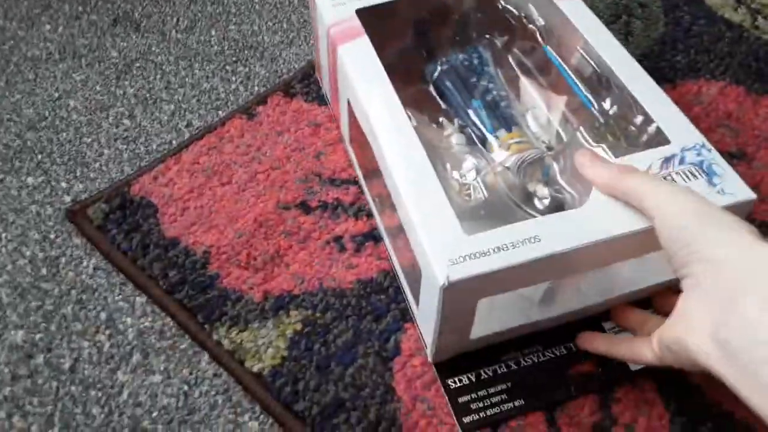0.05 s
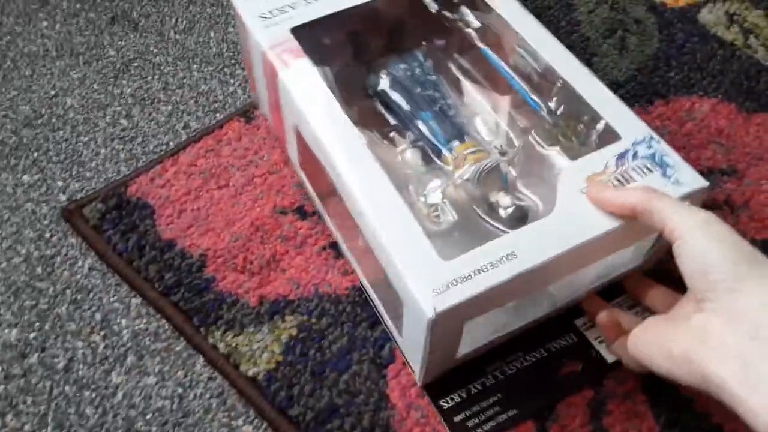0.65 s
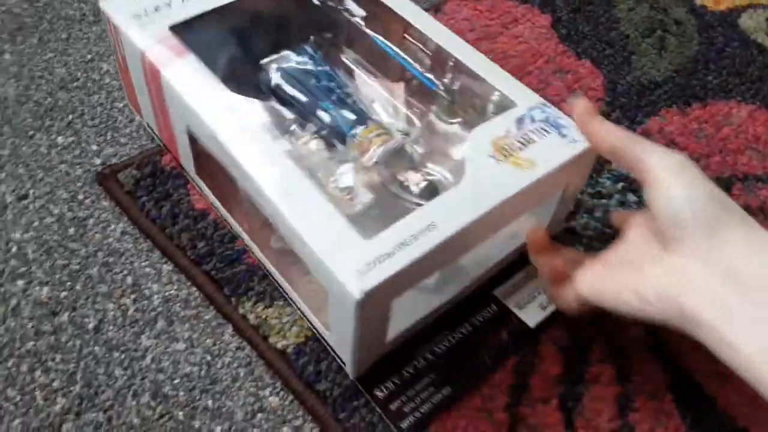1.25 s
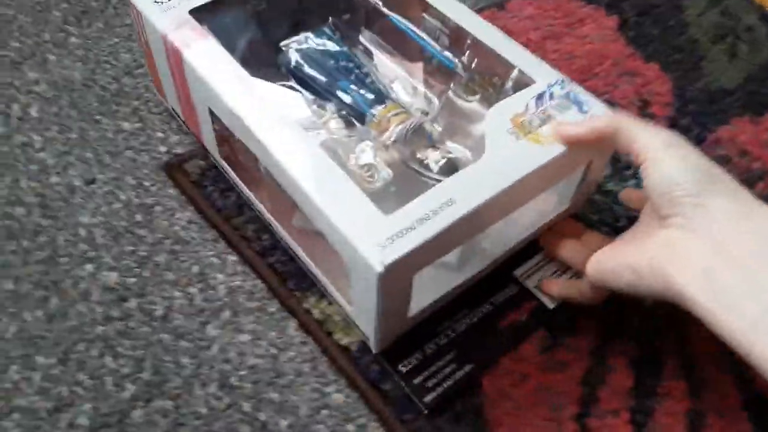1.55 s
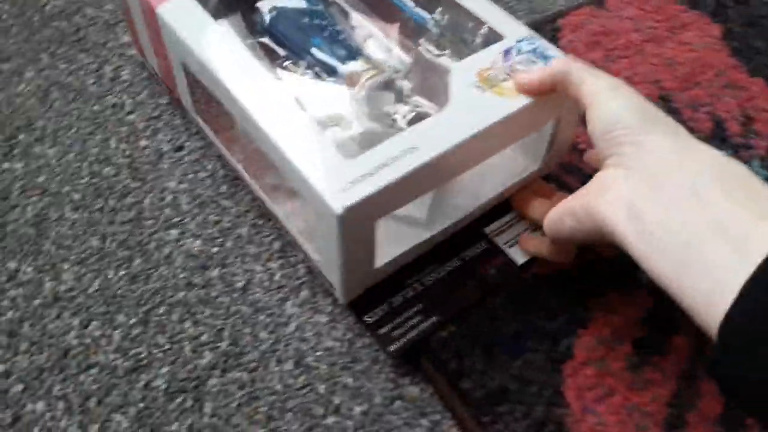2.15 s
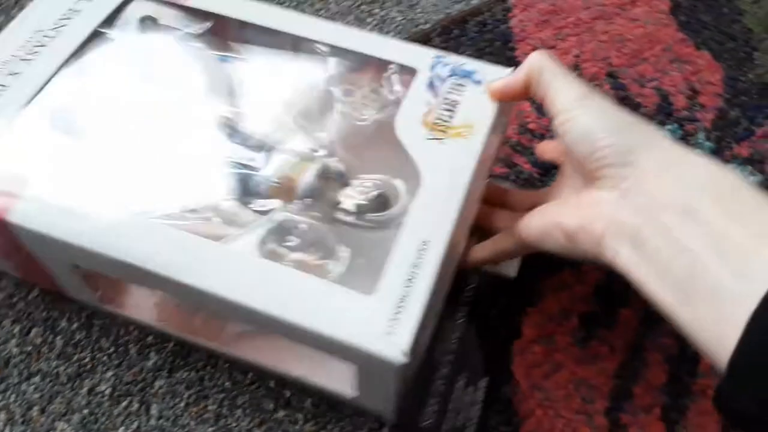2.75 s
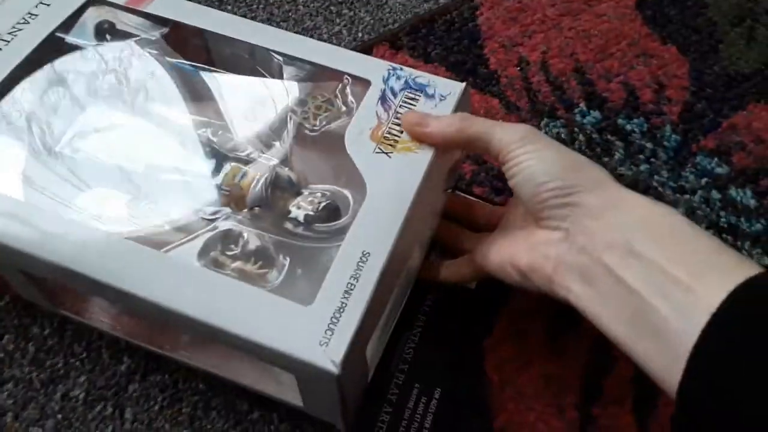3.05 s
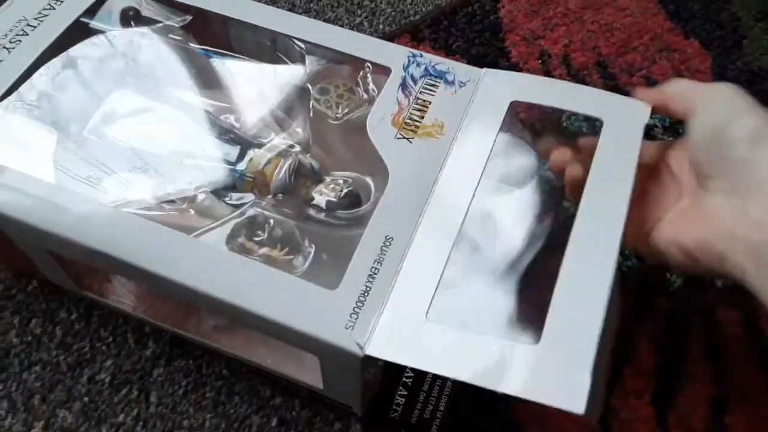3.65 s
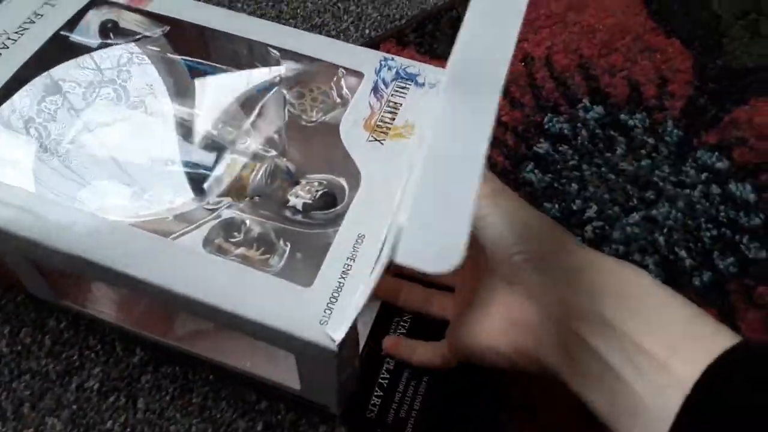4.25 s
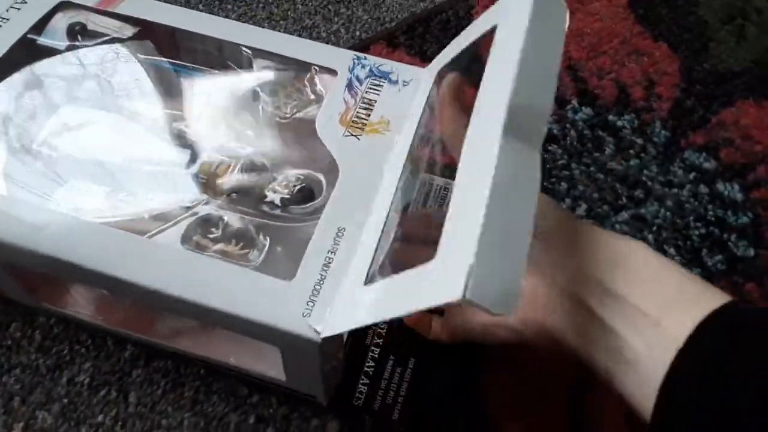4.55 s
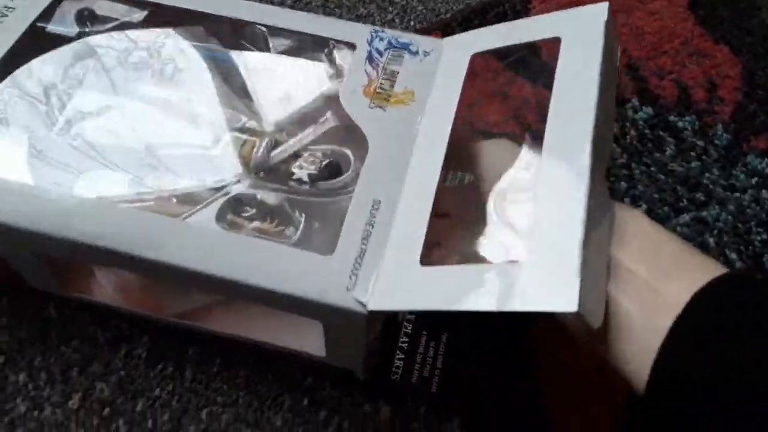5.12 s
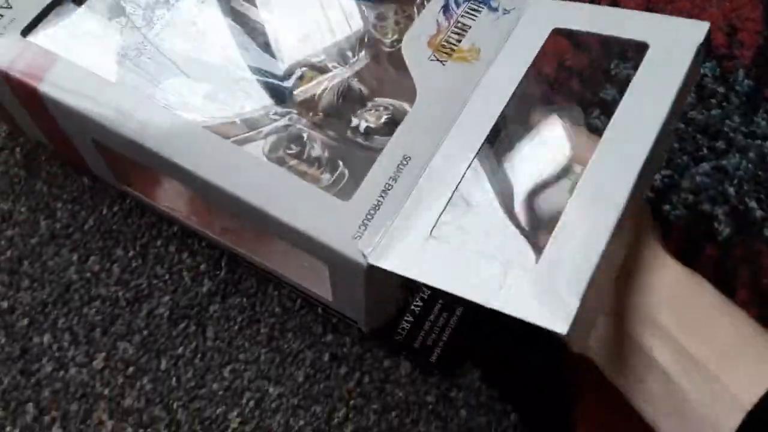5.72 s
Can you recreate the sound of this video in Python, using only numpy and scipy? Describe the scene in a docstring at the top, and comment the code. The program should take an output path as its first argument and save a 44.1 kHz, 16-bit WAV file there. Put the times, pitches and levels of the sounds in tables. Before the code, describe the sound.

A cardboard box bumps and rubs on a rug, then its flap scrapes open with sharp snaps and plastic pops.

```python
"""A cardboard display box is turned on a rug, close to a small microphone in a furnished room.
First it bumps on the floor, its plastic tray ticking, while hand and sleeve rub along the card.
Around 3 s the end flap is prised and scraped out of its slot with a squeak, and a tray dimple pops.
More bumps follow; from 4.6 s fingers snap the inner flaps and further dimples flip.
The microphone port rings in the treble throughout."""
import sys
import numpy as np
from scipy import signal
from scipy.fft import rfft, irfft, next_fast_len
from scipy.io import wavfile
from scipy.ndimage import uniform_filter1d, map_coordinates

SR = 44100
rng = np.random.default_rng(int(sys.argv[2]) if len(sys.argv) > 2 else 0)


def dump(signal):
    """Clip the signal to [-1, 1] and save it as 16-bit WAV at the path in sys.argv[1]."""
    limited = np.clip(np.atleast_2d(signal).T, -1, 1)
    pcm = np.round(limited * 32767).astype(np.int16)
    wavfile.write(sys.argv[1], SR, pcm)


N = 263838


def amp(db):
    return 10 ** (np.asarray(db) / 20)


def unit(x):
    return x / np.sqrt(np.mean(x ** 2) + 1e-20)


def along(points, hz):
    """Read a curve of (freq_hz, value) points on a log frequency axis."""
    freq_hz, values = np.transpose(points)
    return np.interp(np.log(hz + 1), np.log(freq_hz + 1), values)


def filtered(x, response):
    """Pass x through a complex frequency response."""
    size = next_fast_len(len(x) + 8192)
    return irfft(rfft(x, size) * response(np.fft.rfftfreq(size, 1 / SR)), size)[:len(x)]


def coloured(x, spectrum):
    """Shape x with an EQ curve of (freq_hz, gain_db), at rms 1."""
    return unit(filtered(x, lambda hz: amp(along(spectrum, hz))))


def wobble(knots_per_s):
    """A smooth random drift."""
    return map_coordinates(rng.standard_normal(N // 100), [np.arange(N) * knots_per_s / SR])


def add(track, start_s, sound):
    """Mix a sound into the track."""
    start = max(round(start_s * SR), 0)
    track[start:start + len(sound)] += sound[:N - start]


def slips(count, per_s):
    """Stick and slip: irregular little jerks of unequal size, at rms 1."""
    happens = rng.random(count) < per_s / SR
    return unit(happens * rng.standard_normal(count))


def background(air_db=-70, hum_db=-77, whine_db=-84, whine_hz=10560, width_hz=170, hiss_db=-85.5):
    """Still room air, a faint hum, and the thin whine and hiss of the electronics."""
    # room tone: freq_hz, gain_db
    air_spectrum = [(20, -5), (50, -4.5), (100, 8.5), (200, -30.5), (500, -15.5), (1000, -14),
                    (3000, -44.5), (7000, -35.5), (16000, -39.5)]
    air = amp(air_db) * coloured(rng.standard_normal(N), air_spectrum)
    hum = amp(hum_db) * unit(np.sin(2 * np.pi * 97 * np.arange(N) / SR))
    whine = unit(filtered(rng.standard_normal(N), lambda hz: np.exp(-((hz - whine_hz) / width_hz) ** 2)))
    return air + hum + amp(whine_db) * whine + amp(hiss_db) * rng.standard_normal(N)


def room(sound, build_up_s=0.0016):
    """The short reverb of a small furnished room, wet only, with a fresh tail each time."""
    # reverb decay: freq_hz, t60_s
    decay = [(100, 0.17), (500, 0.21), (2000, 0.26), (8000, 0.16), (16000, 0.055)]
    # reverb against the direct sound: freq_hz, level_db
    wet = [(100, -1.5), (400, -6), (1500, -8.5), (5000, -7), (12000, -6)]
    hz, t, noise = signal.stft(rng.standard_normal(SR // 3), SR, nperseg=256)
    t60 = along(decay, hz)[:, None]
    power = 2 * np.log(1000) / (t60 * SR)
    fade = amp(along(wet, hz)[:, None] - 60 * t / t60)
    tail = signal.istft(noise * np.sqrt(power) * fade, SR, nperseg=256)[1]
    tail *= 1 - np.exp(-(np.arange(len(tail)) / SR / build_up_s) ** 2)  # the walls answer a moment late
    return signal.fftconvolve(sound, tail)


def rubbing(jolts, settle_s=0.032, sleeve_trim_db=-9):
    """The box shuffles dully on the rug, skin and cloth hiss over card; both swell after a jolt."""
    # handling moves: time_s, slide_db, sleeve_db (before the trim)
    moves = [(0.0, -59.5, -61), (0.37, -67.5, -67.5), (0.6, -59, -56), (0.92, -56, -56), (1.17, -56.5, -50),
             (1.652, -62.5, -54), (1.98, -55, -51), (2.35, -68.5, -53), (2.62, -55.5, -64),
             (2.86, -67, -50.5), (3.019, -63, -72), (3.4, -37, -50), (3.62, -61, -59), (4.1, -60.5, -66.5),
             (4.48, -62, -69), (4.779, -47.5, -59), (5.4, -46.5, -51), (5.98, -48.5, -54.5)]
    # card on rug: freq_hz, gain_db
    slide_spectrum = [(30, -17), (80, -2), (150, 0.5), (350, 1.5), (520, -5), (750, -4), (1200, -17.5),
                      (2500, -18), (6000, -51)]
    # hand and sleeve on card: freq_hz, gain_db
    sleeve_spectrum = [(200, -25), (900, -1.5), (1400, 3), (2200, 2), (3600, 0.5), (5500, -3.5), (7000, -5),
                       (10000, -6), (16000, -2)]
    time_s, *levels = np.transpose(moves)
    slide_db, sleeve_db = [np.interp(np.arange(N) / SR, time_s, db) for db in levels]
    hold = np.exp(-1 / (settle_s * SR))
    unrest = np.sqrt(signal.lfilter([1 - hold], [1, -hold], jolts ** 2))  # rms follower
    slide = coloured(slips(N, per_s=1100) + .5 * rng.standard_normal(N), slide_spectrum)
    sleeve = coloured(0.15 * slips(N, per_s=2300) + rng.standard_normal(N), sleeve_spectrum)
    grip_db = 2 * wobble(knots_per_s=44)
    slide *= np.hypot(amp(slide_db), amp(-28) * unrest) * amp(grip_db)
    sleeve *= np.hypot(amp(sleeve_db), amp(-26) * unrest) * amp(sleeve_trim_db + grip_db)
    return slide + sleeve


def squeak(start_s=3.377, length_s=.022, pitch_hz=8600, level_db=-43, waver_hz=300):
    """The glossy flap squeaks as it leaves the slot."""
    track, t = np.zeros(N), np.arange(SR // 20) / SR
    hz = pitch_hz + waver_hz * unit(uniform_filter1d(rng.standard_normal(len(t)), size=60))
    swell = np.sin(np.pi * np.clip(t / length_s, 0, 1))
    add(track, start_s, amp(level_db) * swell * np.sin(2 * np.pi * np.cumsum(hz) / SR))
    return track + room(track)[:N]


def box_ring(ring_db, scatter_db):
    """One jerk on the box: a direct click, then panel modes whose strengths vary from spot to spot."""
    # modes of the panels and the air inside: pitch_hz, level_db, t60_s
    modes = [(76, -13.5, 0.039), (116, -4.5, 0.019), (158, -10.5, 0.011), (186, -1.5, 0.034),
             (285.3, -6, 0.092), (366.6, 2.5, 0.066), (399, 2, 0.12), (535, -9.5, 0.054), (616.4, -6, 0.1),
             (698, 7, 0.038), (808.5, 1, 0.087), (973, -21.5, 0.021), (1120, -1, 0.027),
             (1535, -0.5, 0.057), (1633, 14.5, 0.015), (2136, 18, 0.013), (2780, 7, 0.031),
             (3220, -11.5, 0.012)]
    t = np.arange(SR // 8) / SR
    hz, db, t60 = np.transpose(modes)[:, :, None]
    strength = amp(db + ring_db + scatter_db * rng.standard_normal(hz.shape))
    bent_hz = hz * (1 + .06 * rng.standard_normal(hz.shape))  # the grip bends and detunes the panels
    return (t == 0) + np.sum(strength * amp(-60 * t / t60) * np.cos(2 * np.pi * bent_hz * t), axis=0)


def voiced(motion, levels_db, span_s=.01, baffle_hz=130):
    """Voice the card's motion in five registers, each with the energy of its level held for span_s."""
    # bounds of the thump, hollow, knock, clack and tick registers: edge_hz
    edges_hz = [35, 250, 560, 1200, 4000, 16000]
    sound = np.zeros(len(motion))
    low_cut = signal.butter(2, baffle_hz, "high", fs=SR, output="sos")  # small panels radiate little bass
    radiated = signal.sosfilt(low_cut, motion)
    for low, high, db in zip(edges_hz, edges_hz[1:], levels_db):
        band = signal.sosfilt(signal.butter(4, [low, high], "band", fs=SR, output="sos"), radiated)
        sound += amp(db) * band * np.sqrt(span_s * SR / (np.sum(band ** 2) + 1e-20))
    return sound


def scrapes(edge_s=0.0023, firm_db=-28.5, firm_slips_per_s=1800):
    """A dragged edge catches and slips: coarsely when pressed, in a fine hiss when light."""
    # card edges and fingers dragged over card: start_s, end_s, level_db, grit_db
    strokes = [(2.769, 2.79, -38, -11.5), (3.13, 3.155, -34.5, 2), (3.165, 3.253, -42.5, -1.5),
               (3.255, 3.3, -35, 3), (3.288, 3.336, -26.5, 2), (3.334, 3.367, -28.5, 7.5),
               (3.388, 3.404, -38, -9), (3.663, 3.668, -49.5, 5.5), (3.89, 3.927, -51.5, 0.5),
               (3.957, 3.995, -36, -9.5), (4.778, 4.827, -59, 9.5), (4.835, 4.886, -47.5, -1.5),
               (5.018, 5.097, -50, 2.5), (5.359, 5.387, -36.5, 5.5), (5.785, 5.824, -60, 12)]
    colour_db, grit_share = [-5, -1.5, -3.5, -4, -12.5], [-0.59, -.6, -0.91, 0.37, 1]  # thump to tick
    track, t = np.zeros(N), np.arange(SR // 4) / SR
    for start, end, db, grit in strokes:
        levels_db = db + np.add(colour_db, np.multiply(grit, grit_share))
        length = max(end - start, edge_s)
        ramp = edge_s + .2 * length  # long strokes start and stop gently
        stroke = np.clip(t / ramp, 0, 1) * np.clip((length + ramp - t) / ramp, 0, 1)
        slips_per_s = firm_slips_per_s * amp(.7 * (firm_db - db))
        force = stroke * (slips(len(t), slips_per_s) + 0.55 * rng.standard_normal(len(t)))
        damped_ring = box_ring(ring_db=-38, scatter_db=3)  # pressing fingers damp the panels
        motion = signal.fftconvolve(force, damped_ring)[:len(t)]
        sound = voiced(motion, levels_db, span_s=length)
        add(track, start - ramp / 2, sound)
        add(track, start - ramp / 2, room(sound))
    return track


def tray_dimples(attack_s=0.00073):
    """Dimples in the thin plastic flip over, each with a brief pitched pop."""
    # dimple flips: start_s, level_db, pitch_hz
    flips = [(3.3727, -8.5, 1665), (3.6686, -19.5, 2706), (4.6824, -25, 3440), (5.1392, -30, 1580),
             (5.3467, -7.5, 2206), (5.4001, -16.5, 2105)]
    # modes of a dimple: pitch_ratio, level_db, t60_s
    modes = [(1.0, 2, .016), (0.74, -8, .015), (1.17, -5.5, 0.012)]
    track, t = np.zeros(N), np.arange(SR // 16) / SR
    ratio, mode_db, t60 = np.transpose(modes)[:, :, None]
    for start, db, hz in flips:
        partials = amp(db + mode_db - 60 * t / t60) * np.sin(2 * np.pi * hz * ratio * t)
        add(track, start, partials.sum(axis=0) * (1 - np.exp(-t / attack_s)))
    return track + room(track)[:N]


def edge_clicks():
    """Cues for the stiff edges of tray, window and flap clicking."""
    # clicks: time_s, contact_s, level_db, crack_db (the tick register)
    clicks = [(0.259, 0.0016, -65, -60), (0.735, .0014, -61, -64.5), (0.996, .001, -57, -52),
              (1.4117, 0.00046, -55, -48), (1.425, 0.00073, -44.5, -60), (1.9823, 0.0012, -41.5, -53.5),
              (2.2555, .0008, -46, -34), (2.659, .0041, -39, -41.5), (3.071, 0.0028, -55.5, -63),
              (3.193, 0.001, -32, -41), (3.265, .0006, -48, -53), (3.32, 0.0019, -27.5, -41),
              (3.3724, .0012, -26.5, -25.5), (3.506, .0034, -44.5, -56.5), (3.666, 0.0045, -36.5, -52),
              (4.205, 0.00095, -75, -75), (4.369, .0021, -58.5, -61.5), (4.988, 0.0025, -43, -52),
              (5.246, 0.0022, -46, -47), (5.306, 0.0019, -38, -40), (5.399, 0.0028, -32, -42),
              (5.586, 0.0022, -38, -48.5)]
    # click colour, thump to clack: gain_db
    colour_db = [-9, -12, -3, -1]
    for time_s, contact_s, db, crack_db in clicks:
        yield time_s, contact_s, [*np.add(db, colour_db), crack_db]


def box_bumps():
    """Cues for the box bumping on rug and hand: the harder the blow, the brighter."""
    # bumps: time_s, contact_s, level_db, hardness_db
    bumps = [(0.118, 0.00081, -52, 0.5), (0.259, .0014, -49, 10.5), (0.304, 0.0017, -49, 2.5),
             (0.498, 0.0064, -57, -2), (0.619, 0.01, -51, -14), (0.648, .008, -51, -16),
             (0.901, 0.0059, -46, 1.5), (0.975, 0.0028, -46.5, 9.5), (0.9959, 0.0018, -37, -6),
             (1.05, 0.0028, -40, 4), (1.065, 0.0031, -38.5, -1.5), (1.2469, 0.0071, -24, -3.5),
             (1.262, 0.0083, -25.5, 3), (1.389, 0.0011, -38.5, 6), (1.8163, .005, -21.5, -2.5),
             (1.823, .007, -26, 6.5), (1.834, 0.0063, -32.5, 9), (1.867, 0.0041, -32.5, 4.5),
             (2.151, 0.0026, -56, 6), (2.416, 0.0023, -50.5, 4), (2.483, 0.0049, -46, -17),
             (2.552, 0.0056, -50, 7.5), (2.6982, 0.00063, -35, 4.5), (2.7872, .0025, -23, -1),
             (3.685, 0.013, -38.5, 0), (3.755, 0.0022, -43.5, -2), (3.934, 0.0042, -39.5, 2.5),
             (3.985, .002, -33.5, 9), (4.052, 0.0025, -37.5, 9.5), (4.103, 0.002, -44.5, 4),
             (4.6308, 0.0028, -36.5, -0.5), (5.264, 0.0028, -34, -1.5), (5.653, 0.0018, -43.5, 6.5)]
    colour_db, hard_share = [0, -0.5, -4, -14, -25], [-0.27, 0.077, 0.51, 0.9, 1]  # thump to tick
    for time_s, contact_s, db, hardness in bumps:
        yield time_s, contact_s, db + np.add(colour_db, np.multiply(hardness, hard_share))


def flap_pops():
    """Cues for the flaps buckling: taut card clacks, slack card sounds hollow."""
    # pops: time_s, contact_s, level_db, tautness_db, crack_db (the tick register)
    pops = [(3.0895, 0.0025, -31, -4, -51), (3.1169, .0022, -22, -2.5, -51.5),
            (3.151, .0052, -19, 0, -34.5), (3.2878, .0043, -26.5, 9, -37), (3.332, 0.0028, -25, 6, -35.5),
            (3.384, 0.0034, -33.5, -13, -58.5), (4.597, 0.0055, -39.5, -10.5, -84),
            (4.676, 0.00305, -32, 7, -64), (4.683, .002, -23, -3, -62), (4.898, 0.0024, -40, 2.5, -52.5),
            (5.1165, 0.0019, -34, -2, -85), (5.14, 0.001, -23, 3, -66), (5.1786, .0037, -29.5, 3, -35),
            (5.315, .0057, -19, -0.5, -32), (5.3208, .0033, -21, -1.5, -37.5),
            (5.3476, 0.00149, -16, -4, -26), (5.36, 0.0087, -35, -3, -36.5),
            (5.4097, 0.002, -23.5, -2.5, -37), (5.6798, .0027, -25.5, 1, -45.5),
            (5.6989, 0.0015, -23.5, -8.5, -75), (5.7445, 0.0013, -33.5, -3.5, -87),
            (5.7779, .0012, -22, -1, -75), (5.961, 0.0061, -41.5, 1.5, -58.5)]
    colour_db, taut_share = [-16.5, -6.5, 1, -7], [-.3, -1.2, 0.24, 0.92]  # thump to clack
    for time_s, contact_s, db, tautness, crack_db in pops:
        body_db = db + np.add(colour_db, np.multiply(tautness, taut_share))
        yield time_s, contact_s, [*body_db, crack_db]


def contacts(cues, jerk=1.79, rise_share=.45):
    """At each cue the card gives way in a short crunch of fibres around one jerk, ringing the box."""
    track, t = np.zeros(N), np.arange(SR // 6) / SR
    for time_s, contact_s, levels_db in cues:
        progress = t / contact_s
        pressure = (1 - np.exp(-(progress / rise_share) ** 2)) * np.exp(-progress)
        snap = 1. * (np.arange(len(t)) == np.argmax(pressure))
        force = pressure * slips(len(t), per_s=9000) + jerk * snap
        direct = signal.fftconvolve(force, box_ring(ring_db=-28, scatter_db=3))[:len(t)]
        # the walls hear all faces of the box at once, so the reverb send is smoother in colour
        send = signal.fftconvolve(snap, box_ring(ring_db=-39, scatter_db=1))[:len(t)]
        start = time_s - rise_share * contact_s / 2
        add(track, start, voiced(direct, levels_db))
        add(track, start, room(voiced(send, levels_db)))
    return track


def scene():
    """The mono mix: everything happens within arm's reach of one microphone."""
    cues = [*box_bumps(), *flap_pops(), *edge_clicks()]
    jolts = contacts(cues) + tray_dimples() + scrapes()
    return (jolts + squeak() + rubbing(jolts) + background())[None]


def record(dry, port_hz=8350, port_q=8, ceiling=.85, top_hz=15850):
    """The microphone port resonates, the sharpest snaps saturate, and the very top is cut off."""
    # microphone tone on top of the port resonance: freq_hz, gain_db
    mic_eq = [(4000, -1.5), (5800, -3.5), (7200, 0), (8600, 0.5), (10000, -3), (11800, -4.5), (16000, -6.5)]
    port = lambda hz: 1 / (1 - (hz / port_hz) ** 2 + 1j * hz / port_hz / port_q)
    heard = filtered(dry[0], lambda hz: port(hz) * amp(along(mic_eq, hz)))
    rounded = heard / (1 + (heard / ceiling) ** 6) ** (1 / 6)
    return filtered(rounded, lambda hz: hz < top_hz)[None]


dry = scene()
out = record(dry)
dump(out)
```